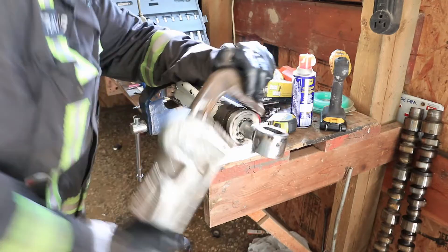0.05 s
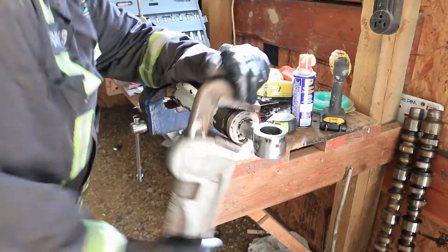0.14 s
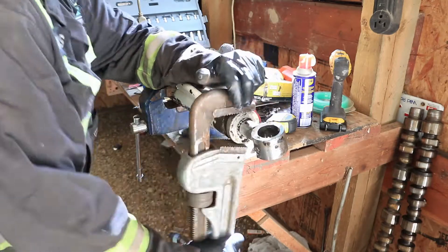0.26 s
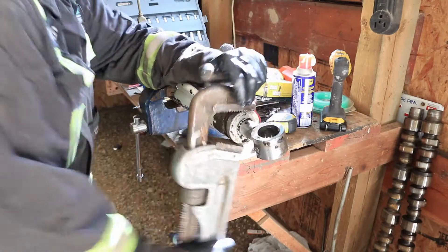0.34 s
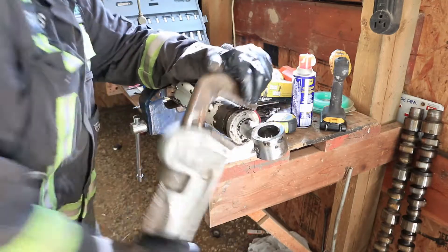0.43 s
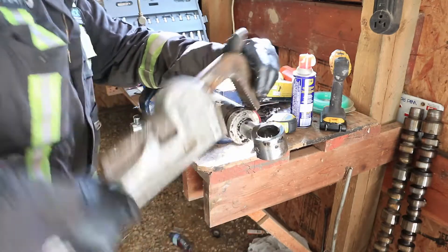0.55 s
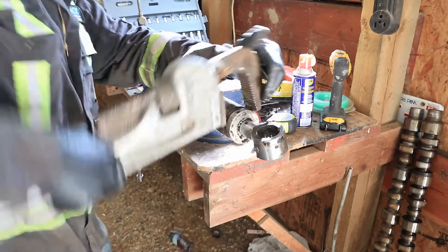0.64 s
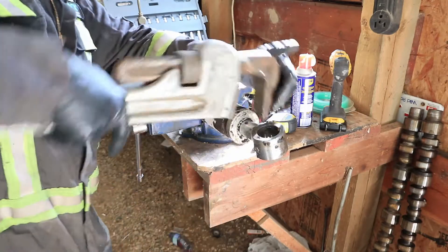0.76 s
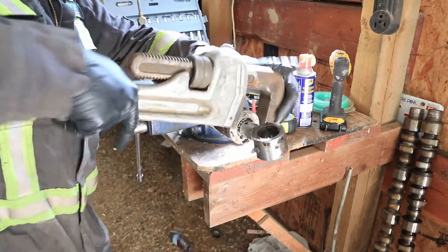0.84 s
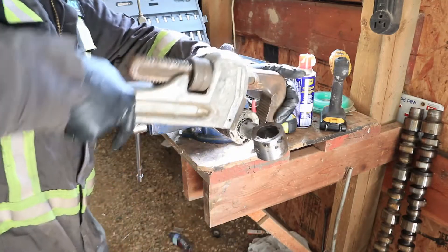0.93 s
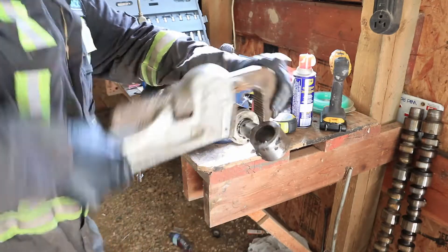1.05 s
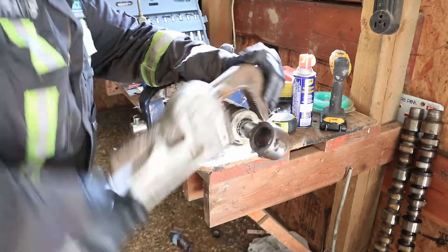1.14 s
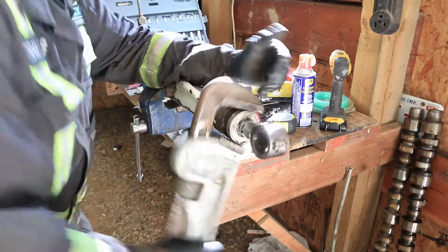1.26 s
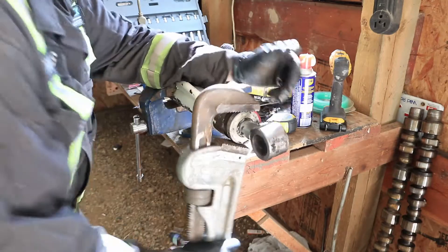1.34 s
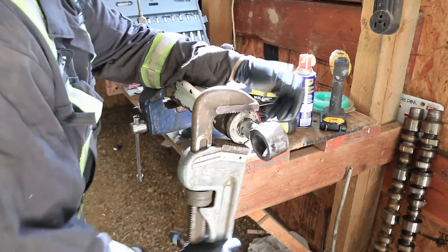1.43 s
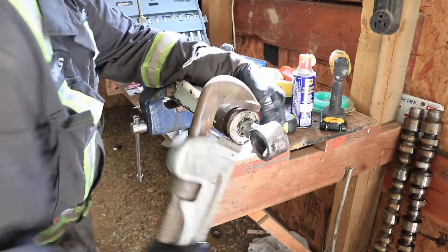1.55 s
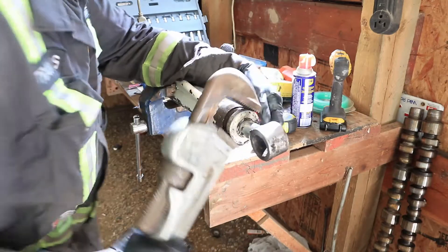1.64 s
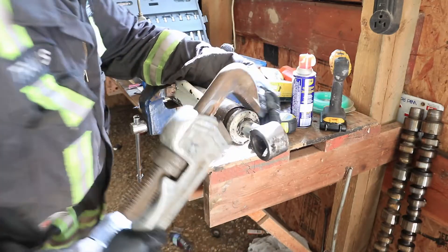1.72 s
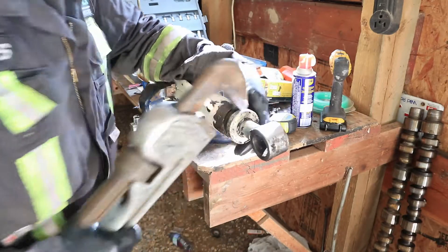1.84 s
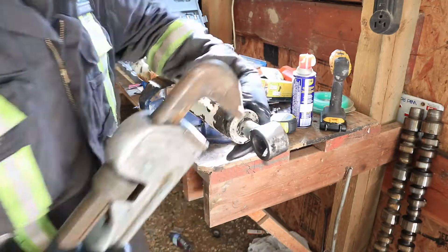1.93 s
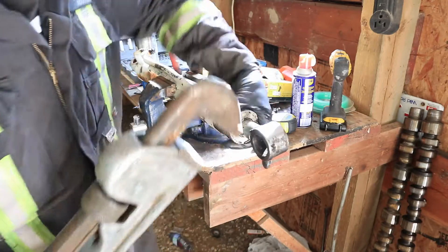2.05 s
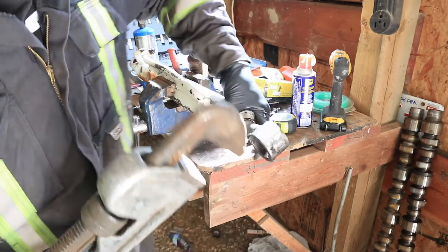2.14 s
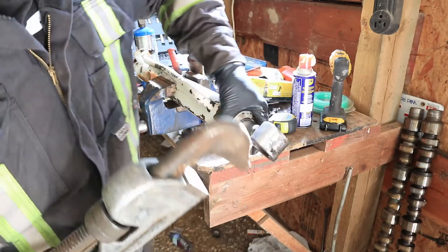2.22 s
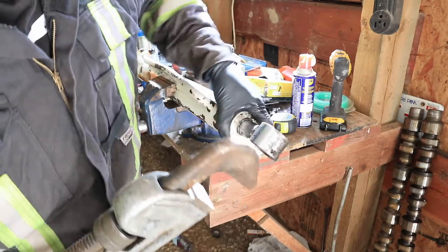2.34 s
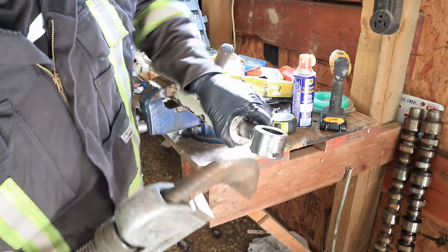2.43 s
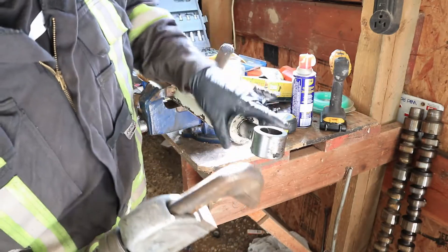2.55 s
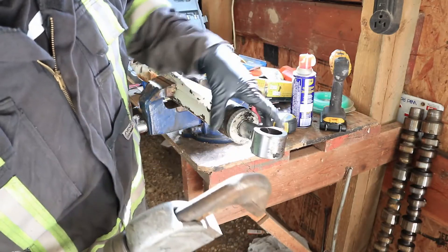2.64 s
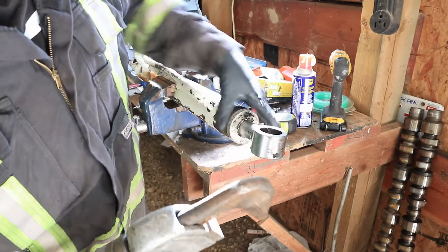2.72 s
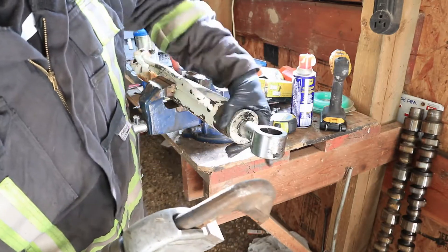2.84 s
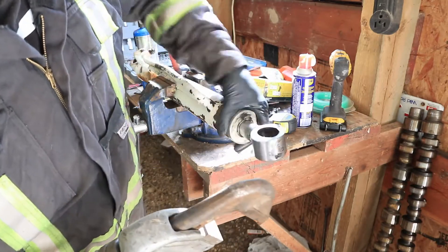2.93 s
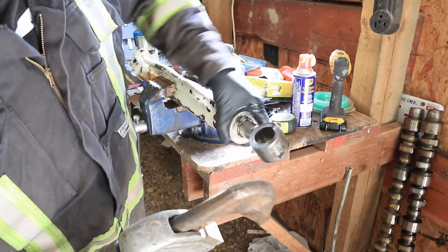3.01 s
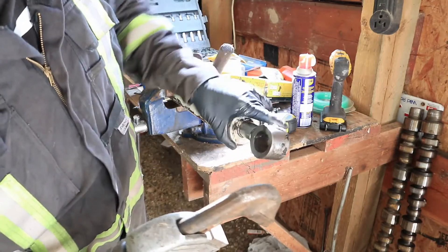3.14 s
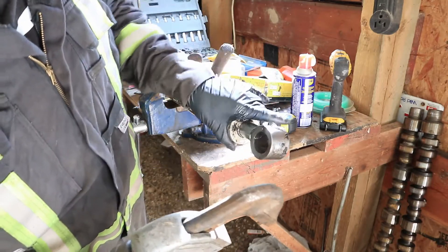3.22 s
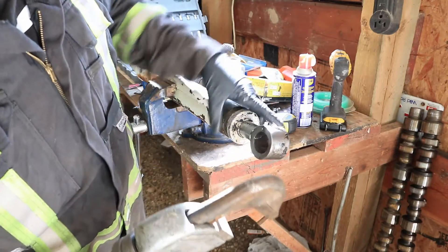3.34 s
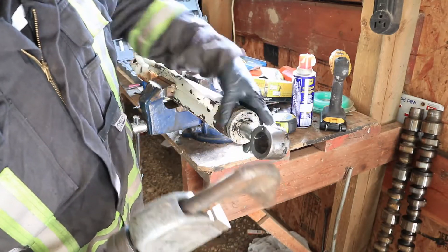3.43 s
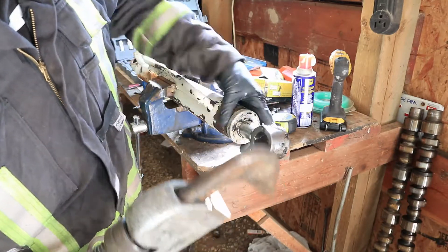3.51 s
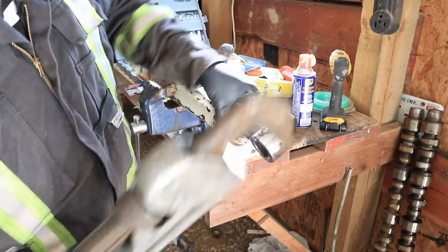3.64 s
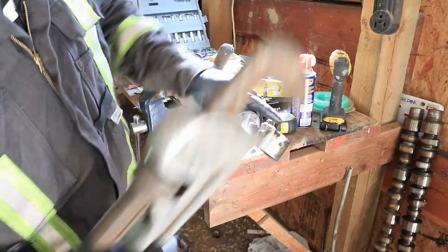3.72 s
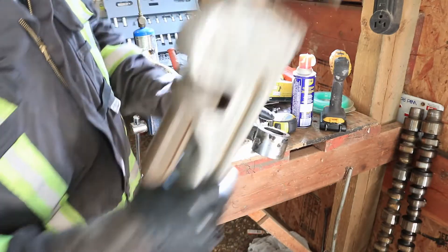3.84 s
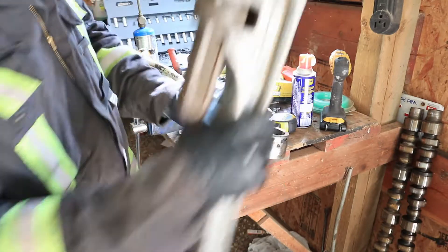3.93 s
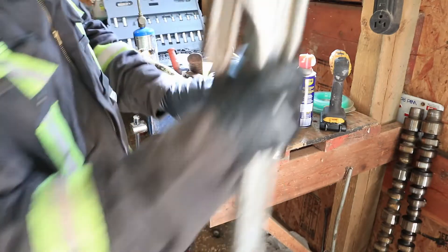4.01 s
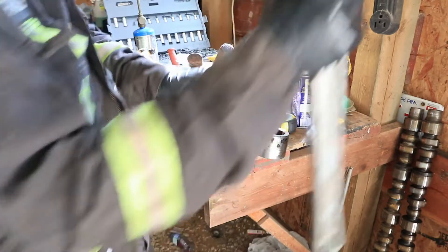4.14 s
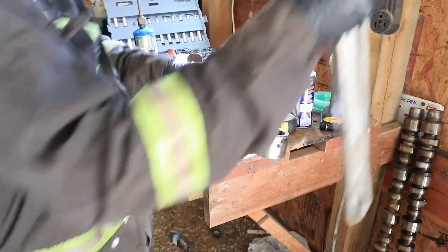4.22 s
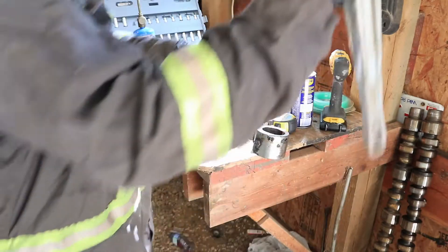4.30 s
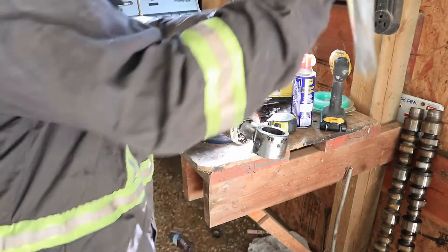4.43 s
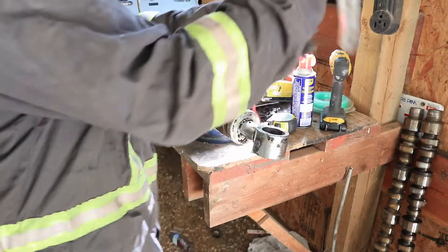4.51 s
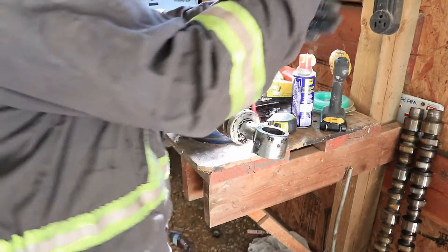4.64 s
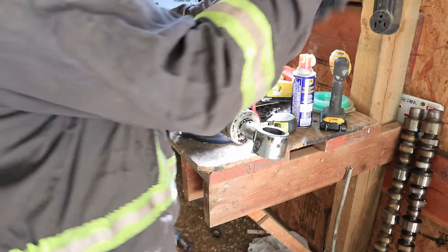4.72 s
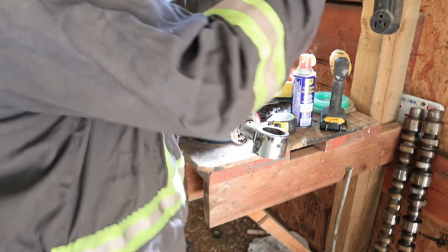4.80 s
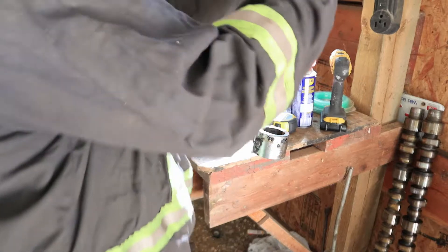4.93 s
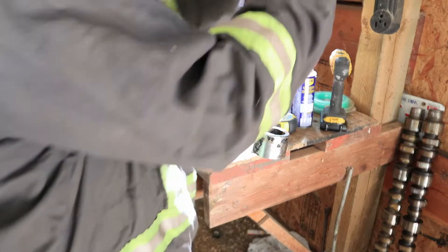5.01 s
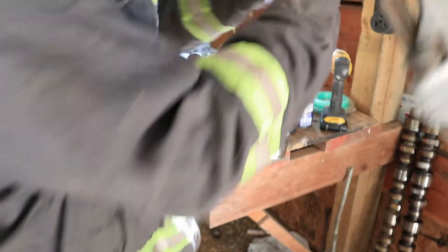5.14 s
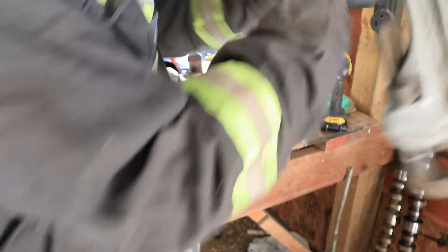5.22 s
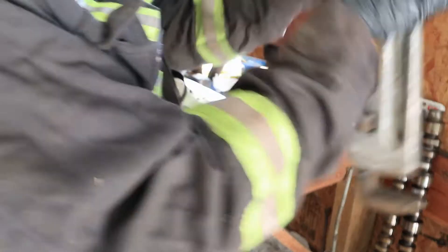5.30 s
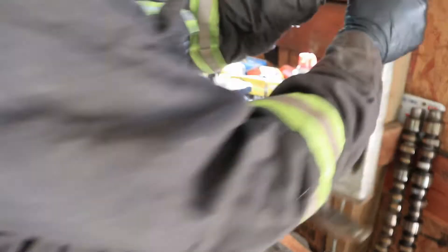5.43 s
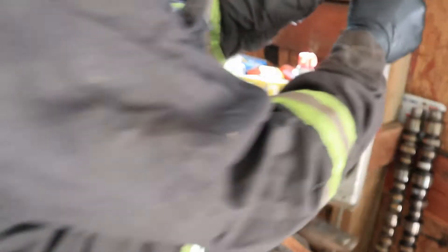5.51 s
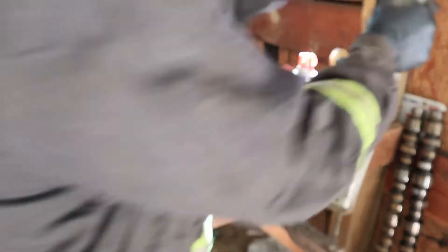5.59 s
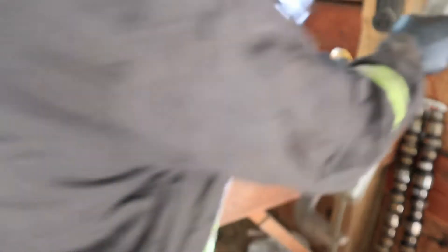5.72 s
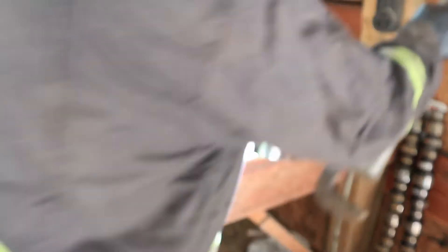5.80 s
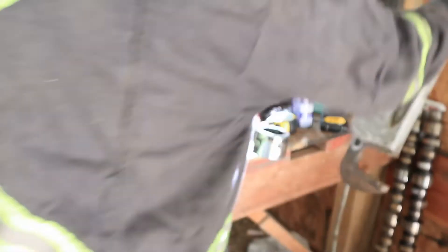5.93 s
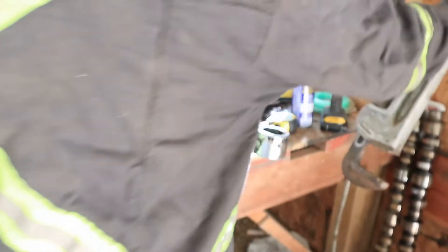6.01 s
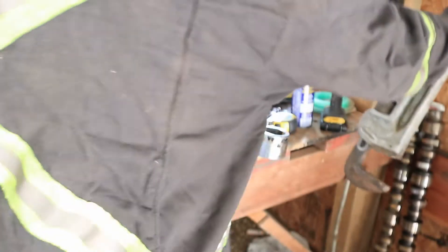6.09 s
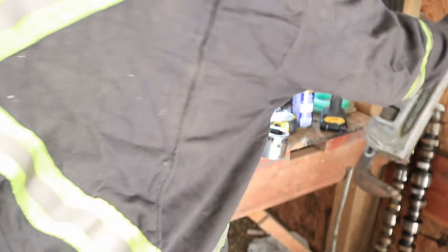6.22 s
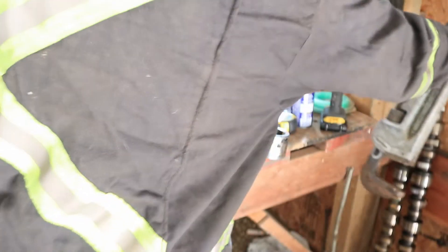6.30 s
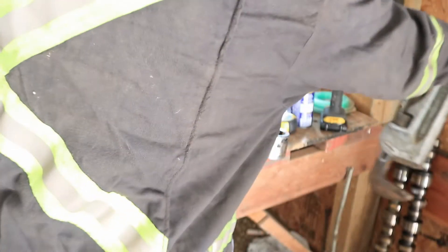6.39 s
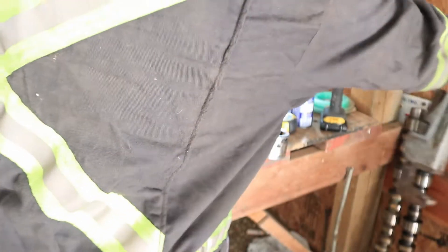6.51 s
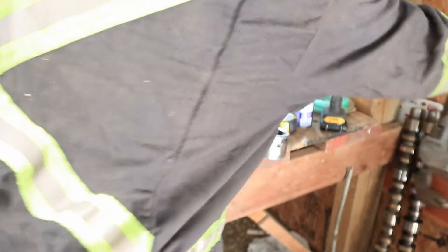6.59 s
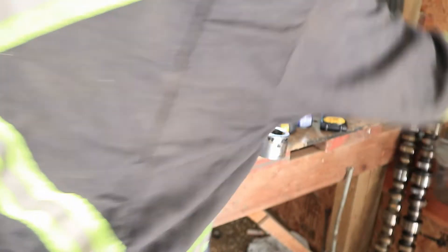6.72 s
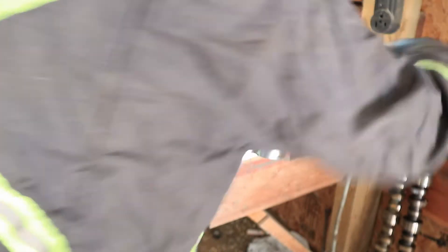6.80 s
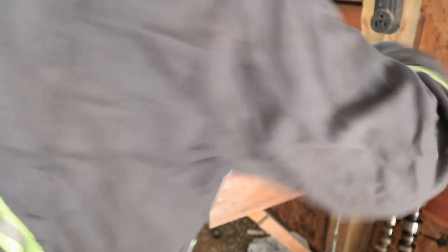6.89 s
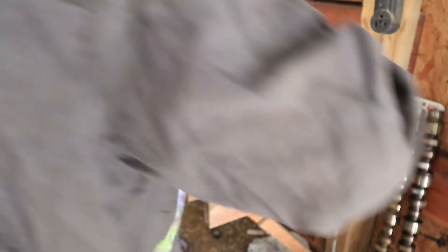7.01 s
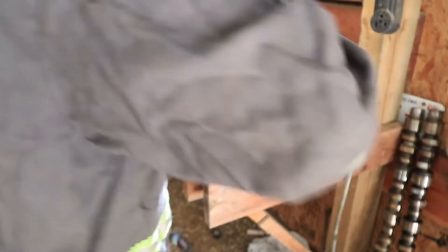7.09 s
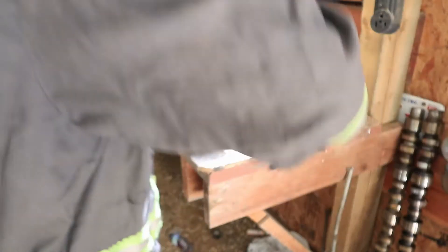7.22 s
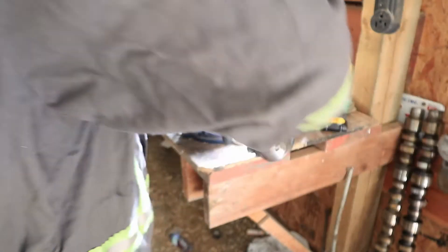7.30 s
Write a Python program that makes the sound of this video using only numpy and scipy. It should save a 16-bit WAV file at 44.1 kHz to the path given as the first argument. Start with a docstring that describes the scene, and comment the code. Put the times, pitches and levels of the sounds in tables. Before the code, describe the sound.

A heavy steel pipe wrench clanks sharply on metal and wood in a small workshop, with stiff cloth rustling close and a faint low hum.

```python
"""Pipe wrench in a wooden workshop

A heavy pipe wrench is worked on a hydraulic cylinder in a bench vise, then carried over and hung on a timber wall.
Each blow is a puff of noise for the crack, decaying sines for the wrench and lower ones for the timber's thud.
Shaped noise makes gloves, jaws and stiff overalls rub and rustle close to the microphone; a mains hum lies under it.
A rod rings, lighter knocks fall between, and a diffuse tail puts blows and knocks in the small room."""
import sys
import numpy as np
from scipy import signal
from scipy.fft import rfft, irfft
from scipy.io import wavfile
from scipy.ndimage import uniform_filter1d

SR = 44100
rng = np.random.default_rng(int(sys.argv[2]) if len(sys.argv) > 2 else 0)


def put_to_file(sound):
    """Save the sound as 16-bit audio at rate SR, in the file named by the first command-line argument."""
    columns = np.atleast_2d(sound).T  # one column per channel
    safe = np.clip(columns, -1, 1)
    whole_steps = np.round(safe * 32767)
    wavfile.write(sys.argv[1], SR, whole_steps.astype(np.int16))


N = 324135

# blows of the wrench on steel and wood; levels are relative within each layer, hardness is held to -14..4 in use:
# start_s, crack_db, crack_colour_hz, handle_db, jaw_db, hardness_db_per_octave, freedom_to_ring_0_to_1,
# thud_db, thud_colour_hz
BLOW_ROWS = [(0.166, 0, 970, -34, -72, -8, 0.8, -8, 190),
             (0.233, -20, 4970, -33, -41.5, 6, 0.2, -14.5, 265),
             (0.799, -19.5, 1430, -27, -18.5, -23.5, 0.9, -6, 400),
             (0.857, 5, 1330, -13.5, -32, 5, 0.17, -12, 515),
             (0.862, -23.5, 1290, -47, -16.5, 5, 0.24, -2.5, 180),
             (0.878, 4, 2480, -16, -23.5, -21.5, 0, 0.5, 222),
             (1.25, -1.5, 920, -21.5, -53.5, -8.5, 0.5, -45, 142),
             (1.59, -1.5, 4585, -17.5, -48.5, 2.5, 0.5, -10.5, 187),
             (1.71, -36.5, 2050, -28, -31.5, -5, 0.8, -21.5, 266),
             (1.773, -5.5, 1230, -53, -21, -7.5, 0.85, -25, 415),
             (1.807, 0.5, 2300, -13.5, -20, -4, 1, -14, 388),
             (1.882, 1.5, 4390, -21.5, -26.5, 4, 0.54, -30, 463),
             (2.225, 0, 1990, -33, -25.5, -15, 1, -29, 380),
             (3.591, -10.5, 884, -51, -37, -19, 0.9, -9, 176),
             (3.842, -14, 886, -52, -50, -21.5, 0.2, -23, 634),
             (4.424, -13.5, 835, -52, -38, -2, 0.7, -18, 615),
             (4.655, 1, 840, -25, -46, -15.5, 1, -12, 482),
             (4.722, -1.5, 654, -35.5, -56.5, -13, 0, -21, 607),
             (4.976, -21, 1337, -15.5, -18, -15.5, 0.75, -16.5, 462),
             (5.025, 7.5, 4400, -11.5, -49, 3, 0.41, -43, 589),
             (5.057, -7.5, 1211, -17.5, -68.5, -4.5, 0, -44.5, 468),
             (5.497, -1.5, 2080, -17, -8, -21.5, 0.43, -46, 437),
             (5.512, -10.5, 3100, -4, -36, -10.5, 0.1, -21, 234),
             (5.763, -11, 1470, -21.5, -28, -19, 0.27, -25, 500),
             (6.082, 14, 900, -12, -26, -4.5, 0.92, 3.5, 342),
             (6.09, 4.5, 3135, -18.5, -30, -5, 0.4, -9.5, 452),
             (6.314, -13, 2260, -19, -30, -4.5, 0.45, -12.5, 451),
             (6.327, -22.5, 3135, -27, -45.5, -6.5, 0.6, -14, 489),
             (6.445, -24.5, 1500, -27, -37.5, -8.5, 0.28, -65, 100),
             (6.891, 12.5, 588, -17.5, -17, -18.5, 1, 0, 482),
             (6.896, 12, 2610, -26.5, 1.5, -7, 0.19, -34.5, 470)]
START_S, CRACK_DB, COLOUR_HZ, HANDLE_DB, JAW_DB, HARDNESS, FREEDOM, THUD_DB, THUD_HZ = np.transpose(BLOW_ROWS)
HARDNESS = np.clip(HARDNESS, -14, 4)
EARLY_DB = 13   # steel first sheds energy into the contact: level over the lasting ring

# hands and jaws take hold, slide and let go: start_s, hold_s, bench_rumble_db, rubbing_db, rubbing_colour_hz
GRIP_ROWS = [(0.165, 0.29, -32.5, -41.5, 1220), (0.737, 0.29, -37.5, -37.5, 1160),
             (1.254, 0.044, -28.5, -38, 484), (1.495, 0.72, -31.5, -40.5, 485),
             (2.121, 0.067, -37.5, -39, 350), (2.17, 0.097, -47, -35.5, 1060),
             (2.428, 0.043, -45.5, -45.5, 248), (2.992, 0.21, -36.5, -42, 515),
             (3.59, 0.24, -33.5, -36, 640), (3.85, 0.14, -37.5, -38.5, 700), (3.988, 0.051, -44, -36, 1540),
             (4.145, 0.47, -39.5, -35.5, 540), (4.43, 0.16, -43, -36.5, 680), (4.623, 0.19, -33, -33, 680),
             (4.896, 0.14, -52, -40.5, 720), (5.211, 0.019, -45.5, -43, 1100),
             (5.425, 0.42, -62.5, -43.5, 1530), (5.752, 0.19, -48.5, -43.5, 660),
             (5.881, 0.12, -40, -38.5, 612), (6.32, 0.27, -44.5, -47.5, 483),
             (6.865, 0.28, -48.5, -43, 510)]
GRIP_RISE_DB_PER_S, GRIP_SAG_DB_PER_S, GRIP_FALL_DB_PER_S = 403, 37.5, 119.5
# resting levels under grips and rustles, before the dips: rumble_db, rubbing_db, swish_db, crisp_db
RESTING_DB = [-59, -66.5, -53, -62]


def from_db(db):
    """Gain of a level."""
    return np.exp(np.asarray(db) * (np.log(10) / 20))


def rms_one(x):
    """Scaled to rms 1."""
    return x / np.sqrt(np.mean(x ** 2) + 1e-20)


def at_hz(points, hz):
    """A curve over frequency, read on a log-frequency axis."""
    points_hz, values = np.transpose(points)
    return np.interp(np.log(hz), np.log(points_hz), values)


def bandpass(x, low_hz, high_hz):
    """Second-order Butterworth band."""
    return signal.sosfilt(signal.butter(2, [low_hz, high_hz], "band", fs=SR, output="sos"), x)


def struck(modes, level_db, weight_db, freedom, rise_s, early_db, scatter):
    """Sum of dying, beating modes for each blow; a tight grip shortens the ring and weakens its lasting part."""
    early_share = 0.3   # t60 of the early part over that of the lasting ring
    # each blow loads the parts differently; close mode pairs beat
    detune, beat_hz, beat_depth = 0.023, 68.3, 0.76   # detune is the whole relative span
    hz, mode_db, t60 = np.transpose(modes)[:, :, None]
    out, t = np.zeros(N + SR), np.arange(SR // 4) / SR
    luck = rng.random((len(START_S), 5, len(modes), 1))
    for k, (phase, strength, tune, beat, beat_phase) in enumerate(luck):
        gain_db = level_db[k] + mode_db + weight_db[:, [k]] + 4 * (strength - .5)
        grip = np.clip(freedom[k], .1, 1)
        decay_db = -60 * t / (t60 * np.sqrt(grip))
        lasting = grip * from_db(gain_db + decay_db)
        early = from_db(gain_db + early_db + decay_db / early_share)
        beat_cycles = beat_hz * (beat + .5) * t + beat_phase
        beating = 1 + scatter * beat_depth * np.sin(2 * np.pi * beat_cycles)
        cycles = hz * (1 + detune * (tune - .5)) * t + scatter * phase
        rings = np.sum((lasting + early) * beating * np.sin(2 * np.pi * cycles), axis=0)
        push = np.minimum(t / rise_s[k], 1)
        end_fade = np.minimum((t[-1] - t) * 20, 1)
        i = round(START_S[k] * SR)
        out[i:i + len(t)] += rings * push * end_fade
    return out[:N]


def cracks():
    """The contact itself: a gritty puff of noise around the blow's colour, quicker and bright-edged when hard."""
    t60_s, shortens = 0.049, 0.12   # t60 at 0 dB; weaker cracks are shorter by this share of their level
    out, t = np.zeros(N + SR), np.arange(SR // 8) / SR
    noise = rng.standard_normal((len(START_S), len(t)))
    for s, crack_db, hz, hard_db, puff in zip(START_S, CRACK_DB, COLOUR_HZ, HARDNESS, noise):
        body = rms_one(bandpass(puff, hz / 7.3, min(hz * 1.343, 18000)))
        peak = rms_one(signal.lfilter(*signal.iirpeak(hz, 5.0, fs=SR), puff))
        bright_edge = from_db(-16.0 + 1.7 * hard_db) * puff
        coloured = body + 0.35 * peak + bright_edge
        decay = from_db(-60 * t / (t60_s * from_db(shortens * crack_db)))
        attack = np.minimum(t / (.0008 * from_db(-hard_db)), 1)
        i = round(s * SR)
        out[i:i + len(t)] += from_db(crack_db - 16.0) * coloured * decay * attack
    return out[:N]


def steel(hz, modes, level_db, scatter):
    """Ringing steel: soft contacts cannot drive upper modes; modes at the crack's own colour are driven best."""
    mode_hz = np.array(hz)[:, None]
    tilt_db = HARDNESS * np.log2(mode_hz / 1300)
    colour_db = 11 * np.exp(-(np.log2(mode_hz / COLOUR_HZ) / 0.069) ** 2)
    contact_s = 0.0005 * from_db(-1.8 * HARDNESS)   # soft contacts take longer to push
    return struck(np.c_[hz, modes], level_db, tilt_db + colour_db, FREEDOM, contact_s, EARLY_DB, scatter)


def handle():
    """The wrench handle rings in its lower, sparser set of steel modes."""
    # handle modes: pitch_hz
    handle_pitches = [1252, 1290, 2125, 3135, 4585, 6005]
    # the same modes, t60 when free to ring: level_db, t60_s
    handle_modes = [(-6, 0.31), (-0.5, 0.48), (0, 0.32), (-12, 0.53), (-6, 0.13), (-3, 0.15)]
    return steel(handle_pitches, handle_modes, HANDLE_DB - 14.5, scatter=0.84)


def jaw():
    """The wrench jaw rings in a denser set of steel modes reaching higher."""
    # jaw modes: pitch_hz
    jaw_pitches = [1120, 1500, 1840, 2310, 2620, 3030, 3380, 4315, 5660, 7480, 9280]
    # the same modes, t60 when free to ring: level_db, t60_s
    jaw_modes = [(-6, 0.3), (2, 0.11), (-9, 0.56), (-3.5, 0.26), (-2, 0.22), (1, 0.069), (-6.5, 0.19),
                 (-4, 0.39), (-11, 0.46), (-21.5, 0.89), (-18.5, 0.075)]
    return steel(jaw_pitches, jaw_modes, JAW_DB - 12.5, scatter=0.89)


def wood():
    """Bench, vise and wall timber thud; each spot favours the modes near its own colour."""
    # timber modes: pitch_hz, level_db, t60_s
    timber_modes = [(96.3, 2, 0.14), (143.3, 5.5, 0.092), (190.7, 2.5, 0.096), (257.3, -0.5, 0.14),
                    (341.7, 0.5, 0.069), (394, -5, 0.23), (479.6, 13.5, 0.031), (578.4, 0, 0.13),
                    (684.5, -1.5, 0.11), (916.5, -1.5, 0.18)]
    mode_hz = np.array(timber_modes)[:, :1]
    near_db = -13 * np.abs(np.log2(mode_hz / THUD_HZ)) ** 0.38
    push_s = np.minimum(0.0022 * from_db(-THUD_DB), 0.006)   # heavy thuds set in fastest
    # little scatter keeps the modes nearly in step
    return struck(timber_modes, THUD_DB - 5.5, near_db, np.ones_like(START_S), push_s, -20, scatter=0.17)


def rod():
    """The cylinder rod, knocked twice, rings lengthwise on multiples of one pitch until the jaw closes on it."""
    rod_hz, rod_t60_s, gripped_s = 2864, 0.09, 1.898   # t60 of the lowest order; higher ones last longer
    # knocks on the rod's end: start_s
    rod_struck = [
        [1.81],
        [1.881],
    ]
    # the multiples of the pitch from the first up: level_db
    rod_orders = [-20.5, -24.5, -20, -34.5]
    t = np.arange(N) / SR
    since = np.maximum(t - rod_struck, 0)
    decay_db = -60 * since / rod_t60_s
    ring = 0
    for order, db in enumerate(rod_orders, 1):
        ring = ring + from_db(db + decay_db / order) * np.sin(2 * np.pi * order * rod_hz * since)
    choke = from_db(-800 * np.maximum(t - gripped_s, 0))
    return choke * ring.sum(axis=0)


def knocks():
    """Light bumps and ticks: each builds up over one cycle and dies as a pair of partials."""
    # bumps and ticks with one main pitch: start_s, level_db, pitch_hz, t60_s
    knock_rows = [(0.241, -15.5, 222, 0.073), (0.381, -27.5, 555, 0.044), (0.449, -23.5, 233, 0.055),
                  (0.504, -32, 615, 0.048), (0.728, -19, 255.7, 0.31), (1.266, -11, 144, 0.12),
                  (1.496, -14.5, 148, 0.088), (1.867, -22, 3300, 0.11), (2.166, -19.5, 95, 0.13),
                  (2.743, -35, 3260, .02), (3.557, -18.5, 189, 0.062), (3.612, -18, 166, .12),
                  (3.663, -18.5, 236, .1), (3.686, -23, 200, 0.056), (3.732, -25, 255, 0.13),
                  (4.298, -23.5, 4680, 0.017), (4.688, -14.5, 93.3, 0.16), (5.624, -26, 486, 0.042),
                  (5.911, -24.5, 1473, 0.064), (5.959, -23.5, 1286, 0.06), (6.134, -20.5, 2410, 0.053),
                  (7.226, -42, 184.3, .1)]
    upper_ratio, upper_db = 1.37, -9   # second partial; its ratio is then spread by chance
    out, t = np.zeros(N + SR), np.arange(SR // 4) / SR
    for (s, db, hz, t60), spread in zip(knock_rows, rng.uniform(.9, 1.3, len(knock_rows))):
        main = np.sin(2 * np.pi * hz * t)
        upper = from_db(upper_db) * np.sin(2 * np.pi * hz * upper_ratio * spread * t)
        i = round(s * SR)
        out[i:i + len(t)] += from_db(db - 60 * t / t60) * np.minimum(t * hz, 1) * (main + upper)
    return out[:N]


def drift(rate_hz):
    """Slow chance of spread 1: noise through a double low-pass, made at every 40th sample."""
    r = np.exp(-80 * np.pi * rate_hz / SR)
    slow = signal.lfilter([1], [1, -2 * r, r * r], rng.standard_normal(N // 40 + 2002))
    slow = slow[2000:]   # past the filter's start
    return np.interp(np.arange(N) / 40, np.arange(len(slow)), rms_one(slow))


def friction(spectrum, grain_db, patchy_db):
    """Grainy noise: fibres catch and slip, so the level flutters fast; rms 1."""
    flutter_db = grain_db * drift(80) + patchy_db * drift(14)
    grains = rng.standard_normal(N) * from_db(flutter_db)
    hz = np.maximum(np.arange(N // 2 + 1) * SR / N, 10)
    return rms_one(irfft(rfft(grains) * from_db(at_hz(spectrum, hz)), N))


def strokes(rows, rise_db, sag_db, fall_db):
    """Power over time of each level column: strokes rise, sag while held, then fall (dB per s); powers add."""
    t = np.arange(0, N + 64, 64) / SR
    start, hold, *levels_db = np.transpose(rows)[:, :, None]
    before_db = rise_db * np.maximum(start - t, 0)
    held_db = sag_db * np.clip(t - start, 0, hold)
    after_db = fall_db * np.maximum(t - start - hold, 0)
    shape_db = -before_db - held_db - after_db
    powers = [np.sum(from_db(2 * (db + shape_db)), axis=0) for db in levels_db]
    return [np.interp(np.arange(N) / SR, t, power) for power in powers]


def over_rest(power, rest_db, background):
    """Gain of a moving layer whose power adds to its resting level."""
    return np.sqrt(power + (from_db(rest_db) * background) ** 2)


def rubbing(background):
    """Third-octave bands of friction; each grip lifts the bands around its own colour."""
    # spectrum of rubbing gloves and jaws, relative: pitch_hz, level_db
    rub_spectrum = [(350, -5.5), (600, -1), (1200, -3), (2000, -11), (3500, -20)]
    lift_db, half_width_octaves = 5.5, 0.26
    start, hold, _, rub_db, colour_hz = np.transpose(GRIP_ROWS)
    edges = 160 * 2 ** (np.arange(15) / 3)
    centres = np.sqrt(edges[1:] * edges[:-1])[:, None]
    levels_db = rub_db + lift_db * np.exp(-(np.log2(centres / colour_hz) / half_width_octaves) ** 2)
    powers = strokes(np.c_[start, hold, levels_db.T], GRIP_RISE_DB_PER_S, GRIP_SAG_DB_PER_S, GRIP_FALL_DB_PER_S)
    noise = friction(rub_spectrum, grain_db=2.0, patchy_db=2.5)
    out = np.zeros(N)
    for k, (power, low, high) in enumerate(zip(powers, edges, edges[1:])):
        gain = over_rest(power, RESTING_DB[1], background) * from_db(1.4 * drift(10.0))
        out += gain * bandpass(noise, low, high) * (-1) ** k   # neighbouring bands in opposite sign
    return out


def rumble(background):
    """Low friction noise in the bench follows the grips."""
    # spectrum of bench rumble, relative: pitch_hz, level_db
    rumble_spectrum = [(25, -12), (60, 4.5), (100, -2), (300, -2), (500, -10), (900, -47.5)]
    rows = np.array(GRIP_ROWS)[:, :3]
    power, = strokes(rows, GRIP_RISE_DB_PER_S, GRIP_SAG_DB_PER_S, GRIP_FALL_DB_PER_S)
    noise = friction(rumble_spectrum, grain_db=1.0, patchy_db=3.0)
    return over_rest(power, RESTING_DB[0], background) * noise


def rustles(background):
    """Overalls and gloves brush: two friction noises, a swish and a crisp top, share each stroke."""
    # brushes of cloth: start_s, hold_s, swish_db, crisp_db
    rustle_rows = [(.04, 0.05, -43.5, -49.5), (.24, 0.049, -45, -52.5), (.45, 0.14, -51.5, -79),
                   (.8, 0.061, -40, -52), (1.16, 0.02, -50.5, -61), (1.22, 0.062, -48.5, -58),
                   (1.98, 0.07, -46, -49), (2.105, 0.07, -41.5, -44.5), (2.22, 0.22, -48.5, -60.5),
                   (2.56, 0.016, -42.5, -51), (2.76, 0.071, -44, -52.5), (2.87, 0.023, -39, -56),
                   (2.95, 0.13, -43, -57), (3.22, 0.085, -46, -55.5), (3.41, 0.085, -42, -48),
                   (3.54, 0.095, -43, -53), (3.7, 0.61, -50.5, -59.5), (3.95, 0.08, -42.5, -54.5),
                   (4.12, 0.48, -47, -60), (4.59, 0.086, -36, -40.5), (4.88, 0.0064, -36, -41),
                   (4.95, 0.027, -35.5, -37.5), (5.06, 0.14, -50.5, -50), (5.375, 0.091, -40, -48),
                   (5.535, 0.021, -36, -40), (5.88, 0.11, -51.5, -58), (6.615, 0.081, -54, -63)]
    # spectrum of the swish, relative: pitch_hz, level_db
    swish_spectrum = [(1000, -5), (2200, -2), (3500, -1), (5500, -1.5), (11000, -27.5)]
    # spectrum of the crisp top, relative: pitch_hz, level_db
    crisp_spectrum = [(4500, -23.5), (7500, -3.5), (13000, -2.5), (16000, -7.5)]
    swish_power, crisp_power = strokes(rustle_rows, rise_db=800, sag_db=2, fall_db=298.5)
    swish = friction(swish_spectrum, grain_db=2.5, patchy_db=1.0)
    crisp = friction(crisp_spectrum, grain_db=3.5, patchy_db=1.0)
    return (over_rest(swish_power, RESTING_DB[2], background) * swish
            + over_rest(crisp_power, RESTING_DB[3], background) * crisp)


def workshop(x):
    """Diffuse tail of the room: noise that dies band by band, after a short gap."""
    # reverberation of the workshop: pitch_hz, t60_s
    room_decay = [(100, 0.77), (1000, 0.47), (4000, 0.47), (12000, 0.3)]
    t, edges = np.arange(int(.8 * SR)) / SR, 60 * 2 ** np.arange(9)
    noise, tail = rng.standard_normal((8, len(t))), 0
    for white, low, high in zip(noise, edges, edges[1:]):
        t60 = at_hz(room_decay, np.sqrt(low * high))
        tail = tail + bandpass(white, low, high) * from_db(-60 * t / t60)
    tail = tail * np.clip(t / 0.0055 - .3, 0, 1)
    return signal.fftconvolve(x, tail / np.sqrt(np.sum(tail ** 2)))[:N]


def hum():
    """Mains hum: one steady sine."""
    hum_hz, rms_db = 60, -46.5   # level before the dips
    return from_db(rms_db) * np.sqrt(2) * np.sin(2 * np.pi * hum_hz * np.arange(N) / SR)


def background_gain():
    """Hum and resting noise drop at each listed dip and climb back at a steady rate in dB."""
    # dips of the background: start_s, depth_db
    dip_rows = [(0, 5.5), (.87, 11.5), (1.89, 12), (5.03, 9), (6.089, 18), (6.9, 31)]
    recovery_db_per_s = 9
    t = np.arange(N) / SR
    depth_db = np.max([(db - recovery_db_per_s * (t - s)) * (t >= s) for s, db in dip_rows], axis=0)
    return uniform_filter1d(from_db(-np.maximum(depth_db, 0)), size=900)


def scene():
    """Blows in the room, close handling and hum."""
    blows = cracks() + handle() + jaw() + wood() + rod() + knocks()
    room = from_db(-20.5) * workshop(blows)
    background = background_gain()
    handling = rubbing(background) + rumble(background) + rustles(background)
    return (blows + room + handling + background * hum())[None]


def record(dry):
    """The loudest blows overload the input, which rounds them off below full scale; the top is cut."""
    cutoff_hz = 16400
    hard = dry / (1 + np.abs(dry) ** 6) ** (1 / 6)
    return signal.sosfilt(signal.cheby2(12, 60, cutoff_hz, fs=SR, output="sos"), hard)


dry = scene()
out = record(dry)
put_to_file(out)
```